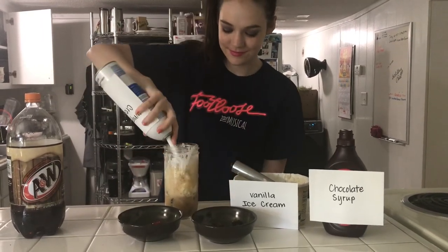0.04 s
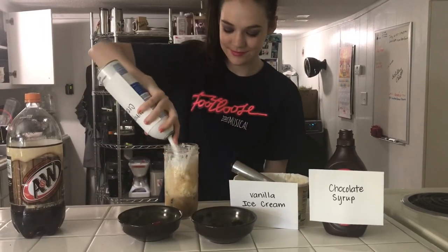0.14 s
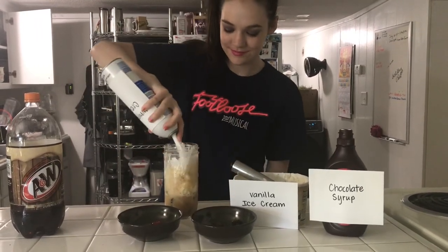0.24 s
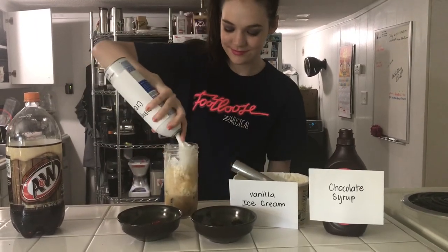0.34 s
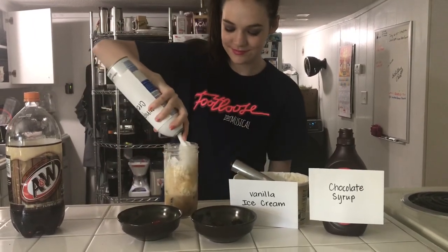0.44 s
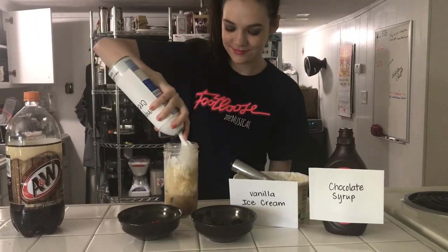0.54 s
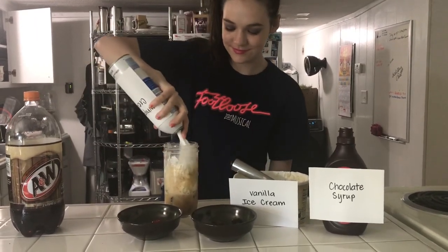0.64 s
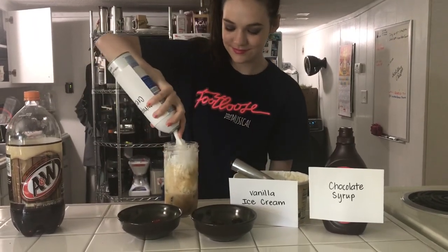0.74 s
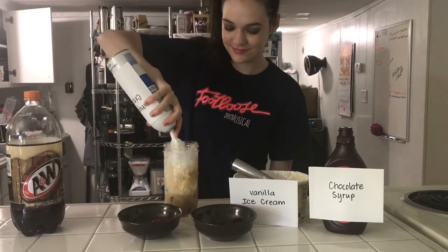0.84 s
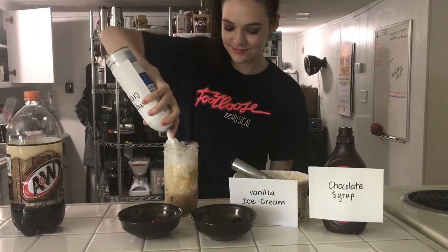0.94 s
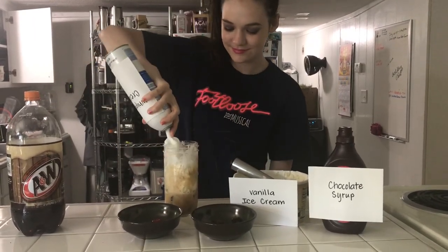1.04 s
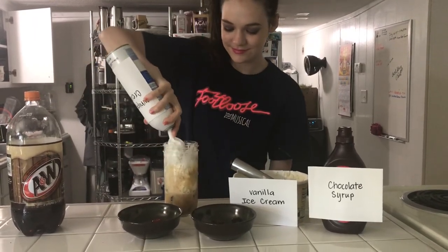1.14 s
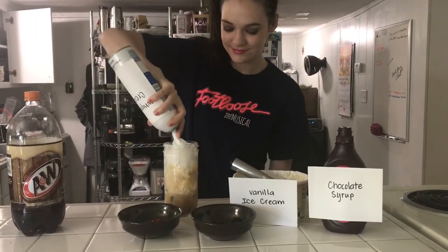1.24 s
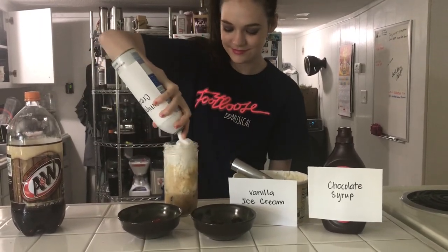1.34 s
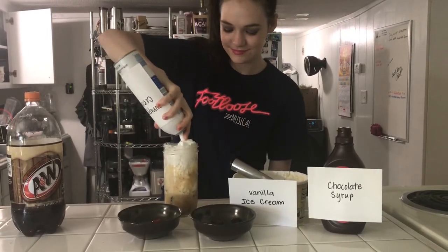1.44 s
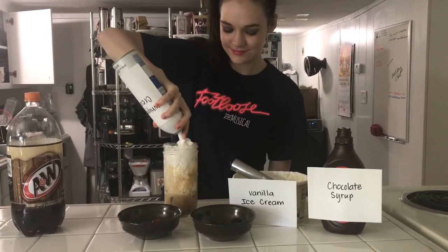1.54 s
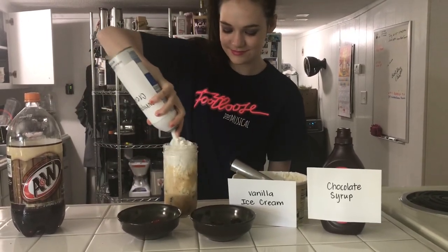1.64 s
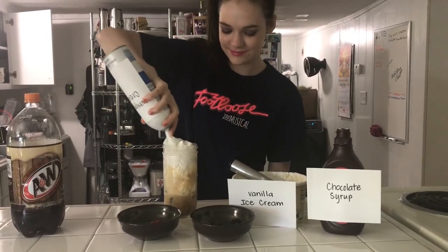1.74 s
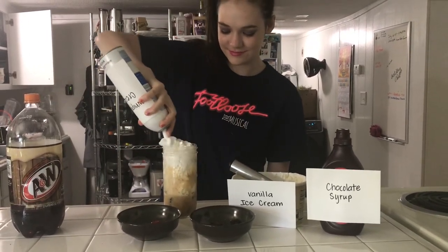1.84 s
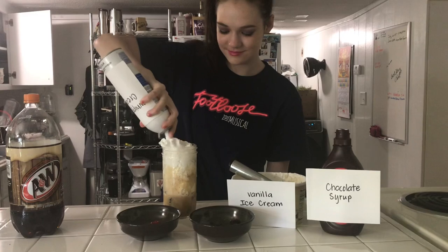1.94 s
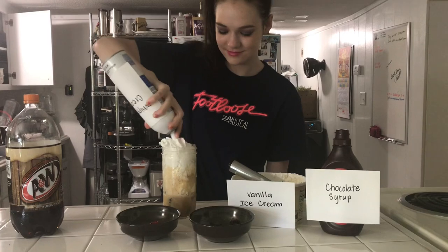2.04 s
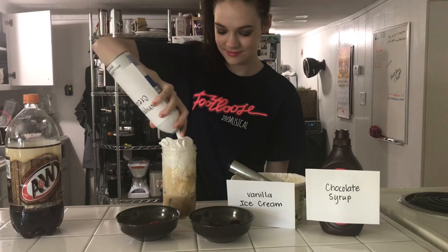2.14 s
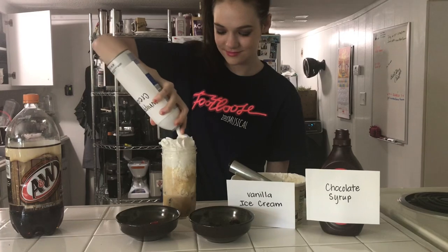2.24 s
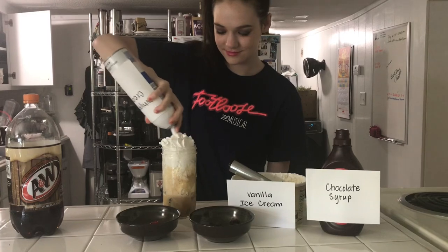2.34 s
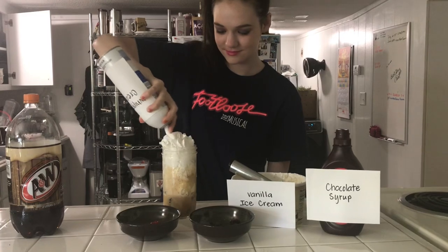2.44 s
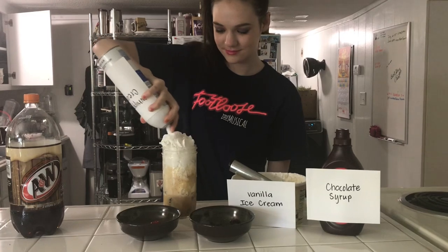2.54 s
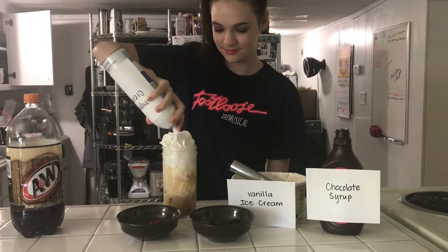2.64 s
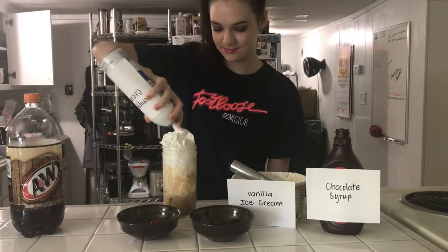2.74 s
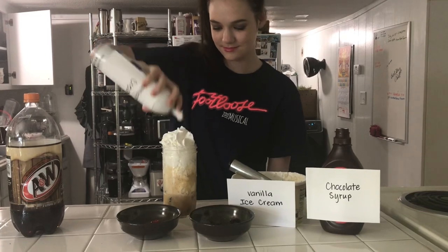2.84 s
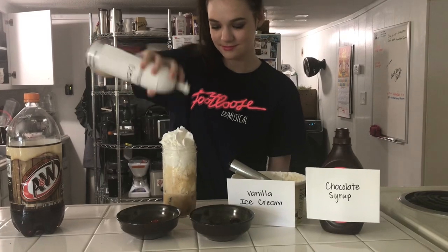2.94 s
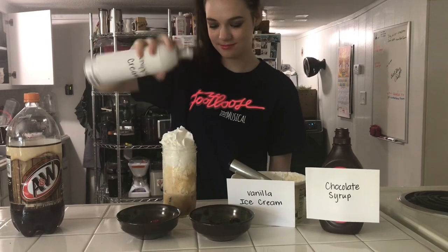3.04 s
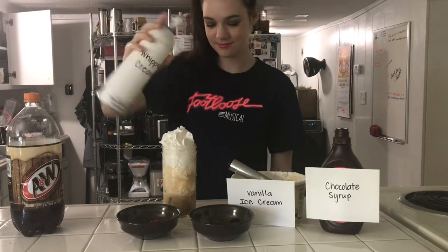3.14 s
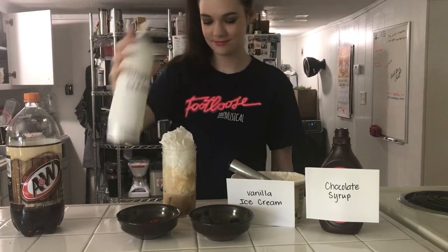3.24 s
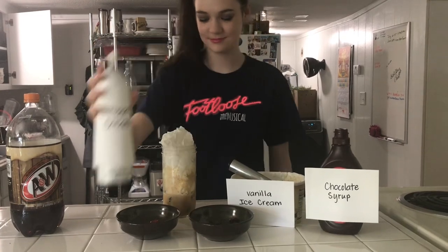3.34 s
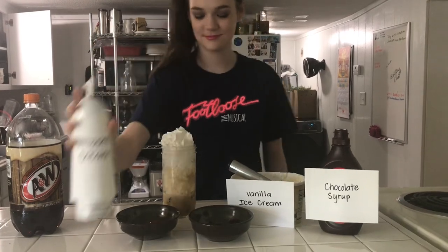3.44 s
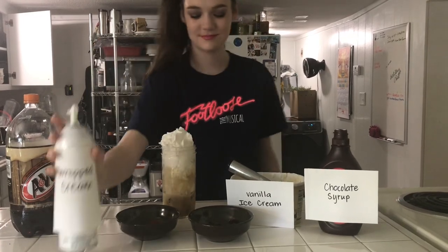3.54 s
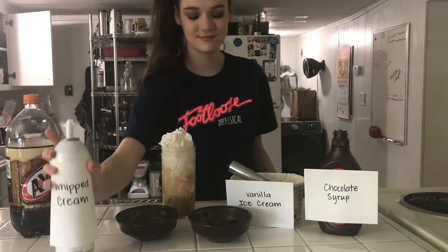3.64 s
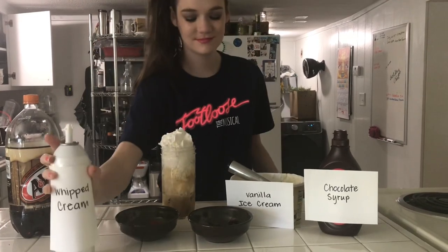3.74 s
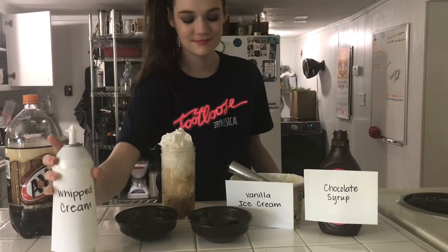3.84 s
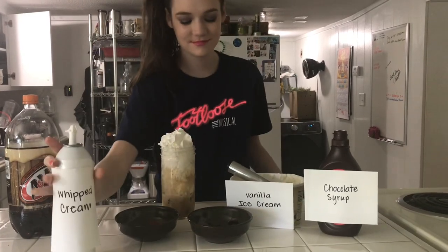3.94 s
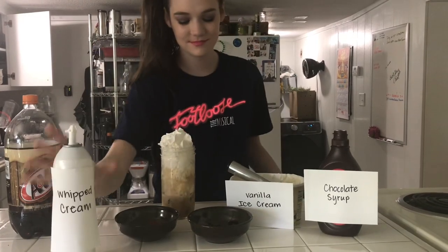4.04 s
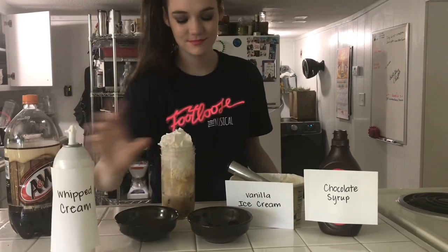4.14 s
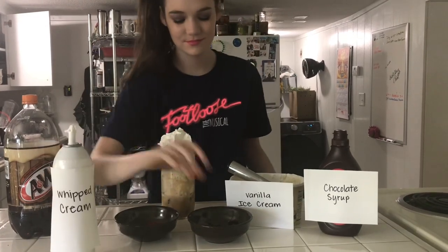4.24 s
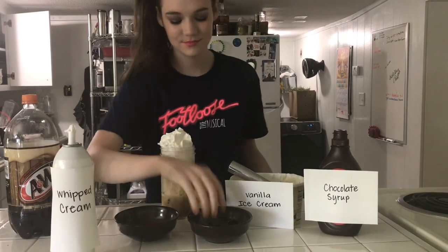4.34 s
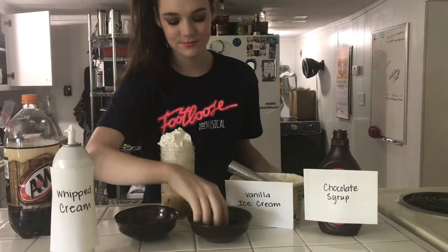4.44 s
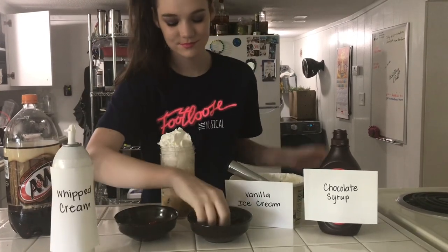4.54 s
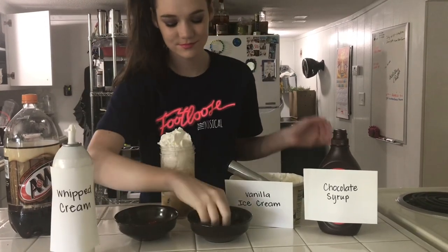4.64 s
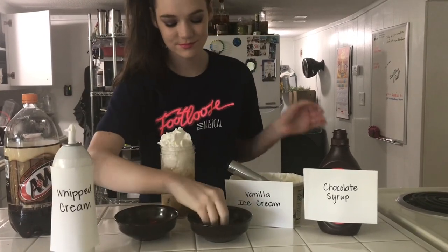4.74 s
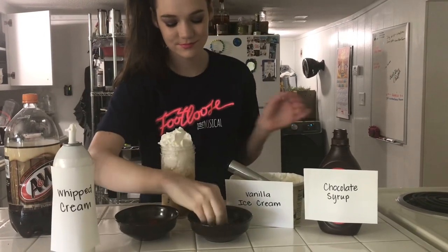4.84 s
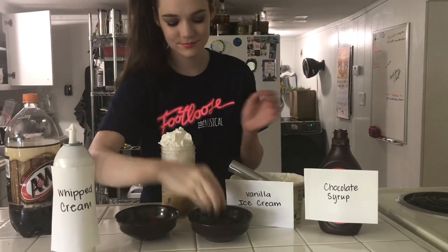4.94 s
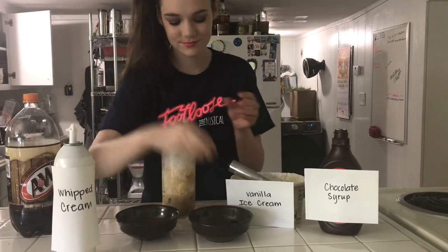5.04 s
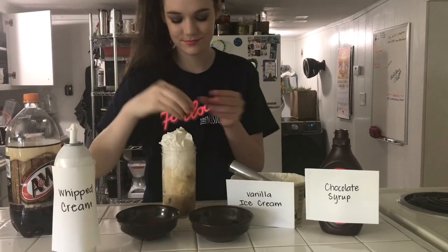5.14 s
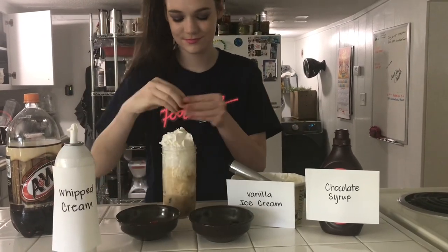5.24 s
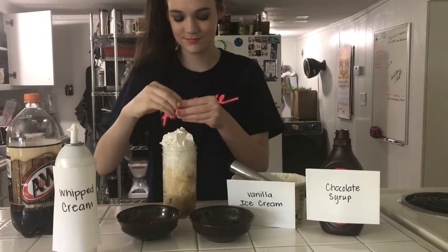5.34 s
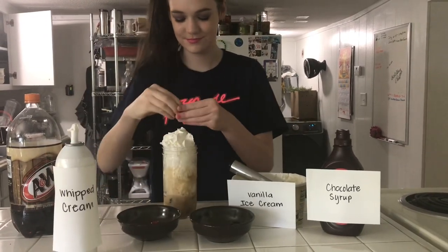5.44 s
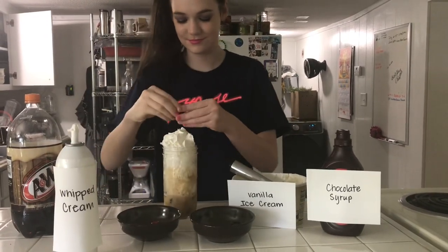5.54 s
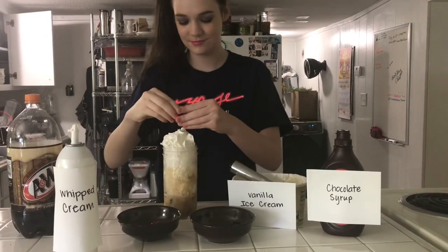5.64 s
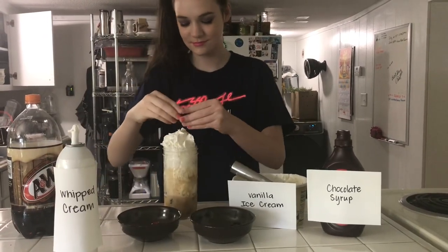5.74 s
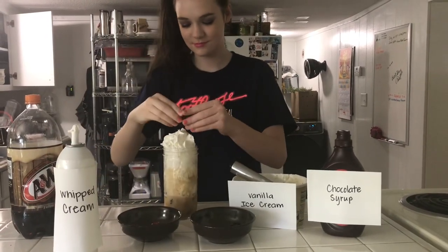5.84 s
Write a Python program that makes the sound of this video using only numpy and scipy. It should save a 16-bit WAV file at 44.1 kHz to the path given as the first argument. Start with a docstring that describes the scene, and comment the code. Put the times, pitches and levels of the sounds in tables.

```python
"""Whipped cream from a can

Cream is sprayed from an aerosol can into a tall glass in a small kitchen: gas hisses through the nozzle,
bubbles excite spout and glass. Then the can clicks in the hand, is knocked down on a tiled counter and
rocks once, and fingers tap a small bowl, each ringing its own modes. Ventilation murmurs underneath."""
import sys
import numpy as np
from scipy import signal
from scipy.fft import rfft, irfft, next_fast_len
from scipy.io import wavfile

SR = 44100
rng = np.random.default_rng(int(sys.argv[2]) if len(sys.argv) > 2 else 0)


def dump_mix(stems):
    """Bounce the given channels to the path in sys.argv[1] as a 16-bit WAV at rate SR."""
    frames = np.atleast_2d(stems).T  # one column per channel
    limited = np.clip(frames, -1, 1)  # hard clip at full scale
    pcm = np.round(limited * 32767).astype(np.int16)
    wavfile.write(sys.argv[1], SR, pcm)


N = 259749
TIME = np.arange(N) / SR
VALVE_SHUT_S, VALVE_CLOSING_S = 2.861, 0.014


def from_db(db):
    return 10 ** (np.asarray(db) / 20)


def unit_rms(x):
    return x / np.sqrt(np.mean(x ** 2) + 1e-20)


def at_hz(points, hz):
    """Table lookup on a log-frequency axis."""
    freqs_hz, values = np.transpose(points)
    return np.interp(np.log(np.maximum(hz, 1)), np.log(freqs_hz), values)


def noise(spectrum):
    """Noise shaped by a spectrum; rms 1."""
    size = next_fast_len(N)
    gain = from_db(at_hz(spectrum, np.arange(size // 2 + 1) * SR / size))
    return unit_rms(irfft(rfft(rng.standard_normal(N), size) * gain, size)[:N])


def drift(rate_hz):
    """Random wander; standard deviation 1."""
    return np.interp(TIME * rate_hz, np.arange(8000), rng.standard_normal(8000)) * np.sqrt(3 / 2)


def lowpass(x, hz, order=2):
    return signal.sosfilt(signal.butter(order, hz, fs=SR, output="sos"), x + 1e-18)


def resonate(x, modes):
    """Parallel band-passes of alternating sign; rms 1."""
    out = 0
    for k, (hz, width_hz, db) in enumerate(modes):
        r, w = np.exp(-np.pi * width_hz / SR), 2 * np.pi * hz / SR
        band = signal.lfilter(np.array([1, 0, -1]) * (1 - r * r) / 2, [1, -2 * r * np.cos(w), r * r], x)
        out += (-1) ** k * from_db(db) * band
    return unit_rms(out)


def ring(clicks, modes):
    """Each click starts one decaying sine per mode."""
    out = 0
    for k, (hz, db, t60_s) in enumerate(modes):
        r, w = from_db(-60 / (t60_s * SR)), 2 * np.pi * hz / SR
        mode = signal.lfilter([np.sin(w)], [1, -2 * r * np.cos(w), r * r], clicks + 1e-18)
        out += (-1) ** k * from_db(db) * mode
    return out


def click(start_s, db):
    return from_db(db) * (np.arange(N) == round(start_s * SR))


def swell(centre_s, sigma_s):
    return np.exp(-0.5 * ((TIME - centre_s) / sigma_s) ** 2)


# air rush: freq_hz, density_db
VENT_SPECTRUM = [(20, -34), (45, -2), (80, -4), (140, -2.5), (200, -8), (255, -6), (400, -13), (570, -16),
                 (960, -13), (1300, -17.5), (2300, -20.5), (4500, -30), (9000, -37.5), (15500, -41)]
# motor hum: pitch_hz, level_db
MOTOR_TONES = [(43, -68.5), (118.4, -63)]

def ventilation(rush_db=-52.72):
    """Steady rush of air with a wavering motor hum."""
    hum = 0
    for hz, db in MOTOR_TONES:
        peak = np.sqrt(2) * from_db(db + 1.1 * drift(6.1))
        hum += peak * np.sin(2 * np.pi * hz * TIME + drift(4.8))
    return from_db(rush_db) * noise(VENT_SPECTRUM) + hum


# near surfaces: delay_s, gain_db
EARLY_ECHOES = [(.0044, -8.5), (.0108, -11), (.0118, -19), (0.017, -32), (0.028, -27)]
# tail decay: freq_hz, t60_s
TAIL_DECAY = [(100, 0.88), (1200, 0.29), (4000, 0.59), (9000, 0.36), (16000, 0.14)]
# tail strength: freq_hz, gain_db
TAIL_GAIN = [(100, -1.5), (1500, -3), (4000, -6.5), (9000, -9.5), (16000, -4)]

def kitchen(x, stretch=1, onset_s=0.0034, build_s=0.0077):
    """Echoes off near surfaces and a diffuse tail that dies soonest at the top."""
    t = TIME[:SR * 3 // 5]
    build = np.clip((t - onset_s) / build_s, 0, 1)
    edges_hz = np.geomspace(50, 18000, 13)
    tail = 0
    for low, high in zip(edges_hz, edges_hz[1:]):
        hz = np.sqrt(low * high)
        bandpass = signal.butter(2, [low, high], "band", fs=SR, output="sos")
        band = signal.sosfilt(bandpass, rng.standard_normal(len(t)))
        decay = build * from_db(-60 * t / at_hz(TAIL_DECAY, hz))
        tail += from_db(at_hz(TAIL_GAIN, hz)) * band * decay / np.linalg.norm(decay)
    echoes = sum(click(delay_s * stretch, db) for delay_s, db in EARLY_ECHOES)[:len(t)]
    return signal.oaconvolve(x, tail + lowpass(echoes, hz=7900))[:N]


# fingers on the bowl: start_s, ring_db, bump_db
BOWL_TAPS = [(4.5757, -51, -26.5), (4.5935, -80, -24.5), (4.5985, -78, -25), (4.6155, -78, -24.5)]
# bowl wall: pitch_hz, gain_db, t60_s
BOWL_MODES = [(6500, 2.5, .045), (6490, -17, .55), (8300, -6, .035), (8850, -5, .02), (10750, -8, .03),
              (13200, -12, .02)]
# bowl against tiles: pitch_hz, gain_db, t60_s
BUMP_MODES = [(110, -21, 0.097), (270, -21, 0.064), (730, -17, .015), (1085, -18, 0.022),
              (1470, -18, 0.022)]

def bowl():
    """A fingernail rings the bowl, which bumps dully on the tiles."""
    nail = sum(click(start_s, ring_db) for start_s, ring_db, _ in BOWL_TAPS)
    bumps = sum(click(start_s, bump_db) for start_s, _, bump_db in BOWL_TAPS)
    return ring(nail, BOWL_MODES) + ring(bumps, BUMP_MODES)


# sharp contacts: start_s, level_db
CRACK_HITS = [(3.2148, -35), (3.24, -40), (3.8235, -18.5), (3.8318, -35), (3.8397, -38), (3.9637, -41),
              (4.063, -46), (4.5757, -52)]
# contact ring: pitch_hz, gain_db, t60_s
CRACK_MODES = [(3500, -11.5, 0.0056), (5850, -2.5, 0.0022), (8430, -4, 0.0035), (12100, -7.5, 0.0015),
               (15000, -12, .003)]
# fingers leaving the can: centre_s, sigma_s, level_db
FINGER_SLIDES = [(4.053, .004, -62), (4.072, 0.012, -53)]
# skin friction: freq_hz, density_db
SKIN_SPECTRUM = [(1500, -22), (4000, 0.5), (8000, -1), (11000, 1), (16000, 1)]

def handling():
    """Dry cracks of can, rim and fingernail; skin brushes off the can."""
    hits = sum(click(start_s, db) for start_s, db in CRACK_HITS)
    slides = sum(from_db(db) * swell(centre_s, sigma_s) for centre_s, sigma_s, db in FINGER_SLIDES)
    return ring(hits, CRACK_MODES) + slides * noise(SKIN_SPECTRUM)


# can on counter: start_s, level_db, cutoff_hz, thump_db
CAN_BLOWS = [(3.8232, -1, 5040, 4), (3.9640, -7, 1510, 1)]
# can body and tiles: pitch_hz, gain_db, t60_s
CAN_MODES = [(670, -18, 0.0068), (1063, -16, 0.021), (1290, -8, 0.0074), (1900, -6.5, 0.0059),
             (2390, -25, 0.029), (2650, -19.5, 0.0057), (4510, -24.5, 0.0077), (1166, -37.5, 0.37),
             (1280, -46, .14), (1500, -34, 0.31), (1840, -46, 0.22), (1820, -52, 0.25)]

def can_knocks():
    """The rim hits the tiles hard, then the can rocks flat with a softer blow."""
    force = sum(lowpass(click(start_s, db), hz, order=4) for start_s, db, hz, _ in CAN_BLOWS)
    return ring(force, CAN_MODES)


# counter top on its cabinet: pitch_hz, gain_db, t60_s
COUNTER_MODES = [(74.5, -45.5, 0.87), (117.4, -42, 0.55), (187.5, -37.5, 0.4), (253.3, -44, 0.4),
                 (336, -44, 0.16), (460, -40, 0.13), (582, -48, 0.29), (747, -42.5, 0.25),
                 (862, -45.5, 0.38), (960, -49, 0.15)]

def counter():
    """Each blow of the can makes the counter top boom."""
    return ring(sum(click(start_s, thump_db) for start_s, _, _, thump_db in CAN_BLOWS), COUNTER_MODES)


# flow set by finger pressure: time_s, level_db
VALVE_FLOW = [(0.0, -36), (0.48, -33.5), (0.67, -36.5), (1.15, -33), (1.32, -33.5), (1.48, -33),
              (1.8, -35.5), (2.02, -32), (2.33, -32.5), (2.41, -36.5), (2.63, -32.5), (2.83, -34.5),
              (2.85, -37.5)]
# jet parts by name: wet_db, db_per_flow_db, dry_offset_db, settle_s
JET_PARTS = {"gurgle": (-44, 0, -9, 0.26), "foam": (-38.5, 0.86, -9, 0.63),
             "splutter": (-43.5, 0.2, -15.5, 0.76), "gas": (-38.5, 0.8, 1, 2.5),
             "sizzle": (-52.5, 0.7, 15, 1.9), "nozzle": (-40.5, 1.1, 6, 0.04)}

def jet_gain(part, flicker_db, flicker_hz, usual_flow_db=-34):
    """One part of the jet follows the flow and settles as cream displaces the dry gas."""
    wet_db, db_per_flow_db, dry_offset_db, settle_s = JET_PARTS[part]
    flow_db = np.interp(TIME, *np.transpose(VALVE_FLOW)) - usual_flow_db
    level_db = wet_db + db_per_flow_db * flow_db + dry_offset_db * np.exp(-TIME / settle_s)
    return from_db(level_db + flicker_db * drift(flicker_hz))


def froth(bursts_per_s, spread_db, gas_db):
    """Tiny bubbles of uneven size burst in a smooth gas flow; rms 1."""
    sizes = from_db(spread_db * np.minimum(rng.exponential(1, N), 4)) * rng.choice([-1, 1], N)
    bursts = unit_rms(sizes * (rng.random(N) < bursts_per_s / SR))
    return unit_rms(bursts + from_db(gas_db) * rng.standard_normal(N))


# hollow of glass and cream: pitch_hz, width_hz, gain_db
GLASS_MODES = [(286, 84, -5.5), (368, 85, -5.5), (567, 127, -4), (696, 68, 1), (915, 60, 1),
               (1150, 93, -1.5), (1323, 94, -5)]
# foam-filled spout: pitch_hz, width_hz, gain_db
SPOUT_MODES = [(3104, 520, -1.5), (4170, 840, -2.5), (6050, 1110, -4.5), (6980, 430, 0.5)]
# wet tip: pitch_hz, width_hz, gain_db
TIP_MODES = [(1516, 370, -2), (2004, 160, 3.5), (2407, 280, 2), (2790, 300, -2)]

def cream():
    """Frothing cream excites glass and spout and splutters at the tip."""
    bubbles = froth(bursts_per_s=5000, spread_db=2.5, gas_db=-1.5)
    gurgle = jet_gain("gurgle", flicker_db=0.61, flicker_hz=25.04) * resonate(bubbles, GLASS_MODES)
    foam = jet_gain("foam", flicker_db=0.72, flicker_hz=29.8) * resonate(bubbles, SPOUT_MODES)
    splutter_gain = jet_gain("splutter", flicker_db=0.95, flicker_hz=35.4)
    tip_bubbles = froth(bursts_per_s=1800, spread_db=3, gas_db=-4)
    return gurgle + foam + splutter_gain * resonate(tip_bubbles, TIP_MODES)


# gas hiss: freq_hz, density_db
GAS_SPECTRUM = [(300, -10), (1800, -13.5), (5000, -9), (9000, 1.5), (11400, 0), (13100, -1), (14200, -5.5),
                (16000, -15.5)]

def gas_jet(sizzle_hz=14600, width_hz=1300):
    """Gas hisses broadly and, while dry, sizzles at the very top."""
    sizzle_gain = jet_gain("sizzle", flicker_db=0.8, flicker_hz=25)
    sizzle = sizzle_gain * resonate(rng.standard_normal(N), [(sizzle_hz, width_hz, 0)])
    return sizzle + jet_gain("gas", flicker_db=0.5, flicker_hz=35.1) * noise(GAS_SPECTRUM)


# nozzle resonance: time_s, pitch_hz
NOZZLE_GLIDE = [(0.0, 9530), (0.71, 8820), (1.02, 9240), (1.32, 8510), (2.05, 8750), (2.16, 8320),
                (2.41, 8640), (2.85, 8360)]

def nozzle(wander_hz=130):
    """Narrow-band turbulence rides a resonance that sinks as cream lines the nozzle."""
    pitch_hz = np.interp(TIME, *np.transpose(NOZZLE_GLIDE)) + wander_hz * drift(35)
    phase = 2 * np.pi * np.cumsum(pitch_hz) / SR
    inphase, quadrature = lowpass(rng.standard_normal((2, N)), hz=533)
    band = unit_rms(inphase * np.cos(phase) + quadrature * np.sin(phase))
    return jet_gain("nozzle", flicker_db=0.83, flicker_hz=70) * band


# brief whistles: centre_s, sigma_s, pitch_hz, width_hz, level_db
WHISTLE_BANDS = [(0.083, .025, 9450, 500, -37), (0.43, 0.15, 3120, 378, -45),
                 (.99, 0.053, 2900, 450, -42.5), (1.17, 0.065, 3700, 648, -45.5),
                 (1.59, 0.068, 3290, 120, -43), (1.541, 0.087, 4230, 140, -46), (1.48, .13, 6950, 350, -45),
                 (2.039, 0.042, 8850, 324.1, -40), (2.18, 0.081, 8280, 250, -40),
                 (2.67, 0.088, 11450, 833.3, -42), (2.815, 0.011, 3320, 183.6, -38)]

def whistles():
    """Brief whistles swell and fade at different pitches during the spray."""
    out = 0
    for centre_s, sigma_s, hz, width_hz, db in WHISTLE_BANDS:
        band = resonate(rng.standard_normal(N), [(hz, width_hz, 0)])
        out += from_db(db) * swell(centre_s, sigma_s) * band
    return out


def spray():
    """The whole jet stutters together until the valve shuts."""
    jet = cream() + gas_jet() + nozzle() + whistles()
    stutter_db = 0.28 * drift(39.7) + 0.77 * drift(300)
    valve = np.clip((VALVE_SHUT_S - TIME) / VALVE_CLOSING_S, 0, 1)
    return valve * from_db(stutter_db) * jet


def circling(x, positions=7, room_db=-3.5):
    """The hand circles over the glass: the spray crossfades between sets of room paths."""
    place = np.minimum(TIME / VALVE_SHUT_S, 1) * (positions - 1)
    room = 0
    for k in range(positions):
        share = np.sqrt(np.clip(1 - np.abs(place - k), 0, 1))
        room += kitchen(x * share, stretch=rng.uniform(0.8, 1.3))
    return x + from_db(room_db) * room


def scene():
    """Mono mix on both channels; each contact has its own room send."""
    knocks, cracks, taps = can_knocks(), handling(), bowl()
    send = from_db(0.5) * knocks + from_db(-2) * lowpass(cracks, hz=11500) + from_db(-0.5) * taps
    contacts = knocks + cracks + taps + kitchen(send) + counter()
    mono = circling(spray()) + contacts + ventilation()
    return np.array([mono, mono])


# microphone port: centre_hz, width_hz, gain_db
TREBLE_DIPS = [(5300, 390, -0.5), (7680, 180, -3), (10550, 690, -6.5)]

def record(dry, cutoff_hz=15720):
    """The microphone port notches the treble; a steep low-pass cuts the top."""
    for hz, width_hz, db in TREBLE_DIPS:
        band = signal.lfilter(*signal.iirpeak(hz, hz / width_hz, fs=SR), dry)
        dry = dry + (from_db(db) - 1) * band
    return signal.sosfilt(signal.ellip(12, 0.1, 80, cutoff_hz, fs=SR, output="sos"), dry)


dry = scene()
out = record(dry)
dump_mix(out)
```